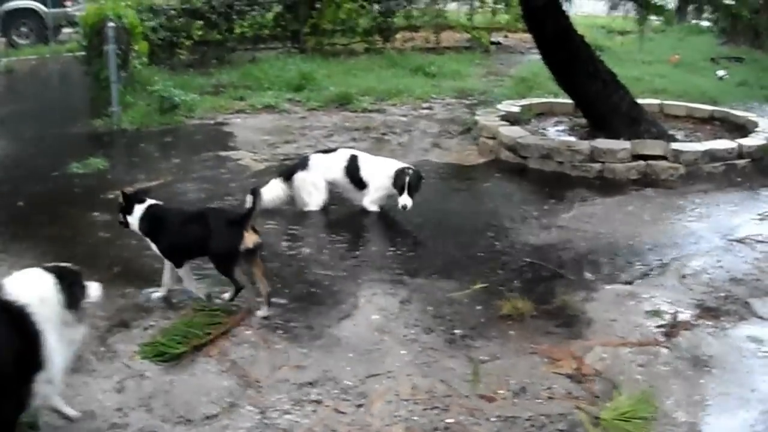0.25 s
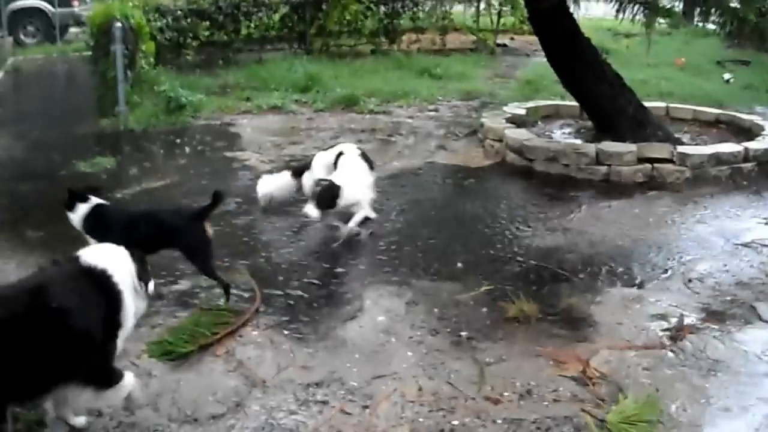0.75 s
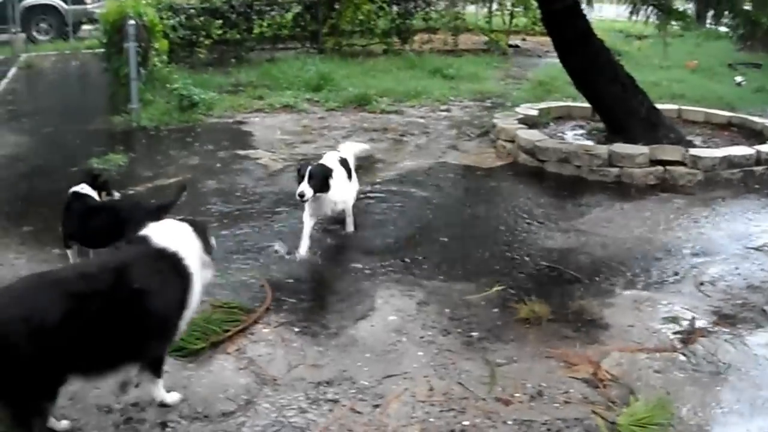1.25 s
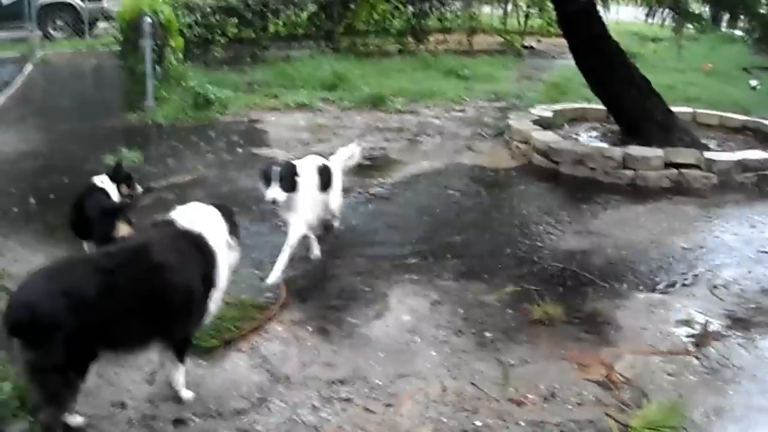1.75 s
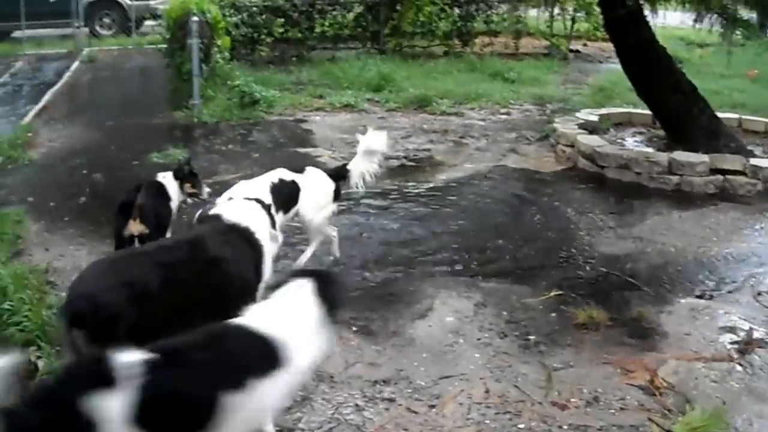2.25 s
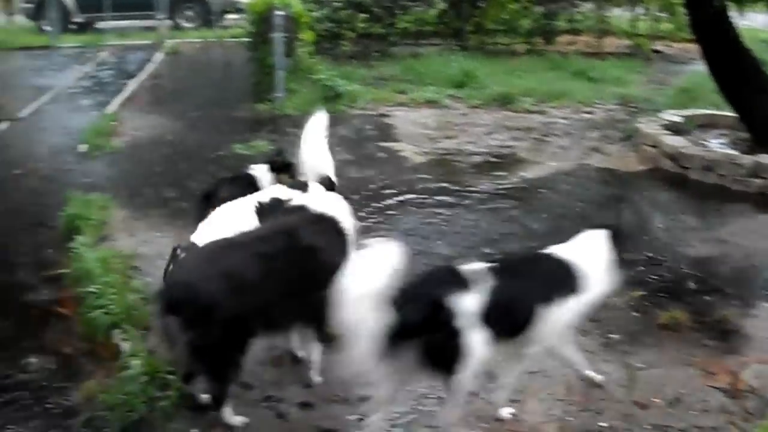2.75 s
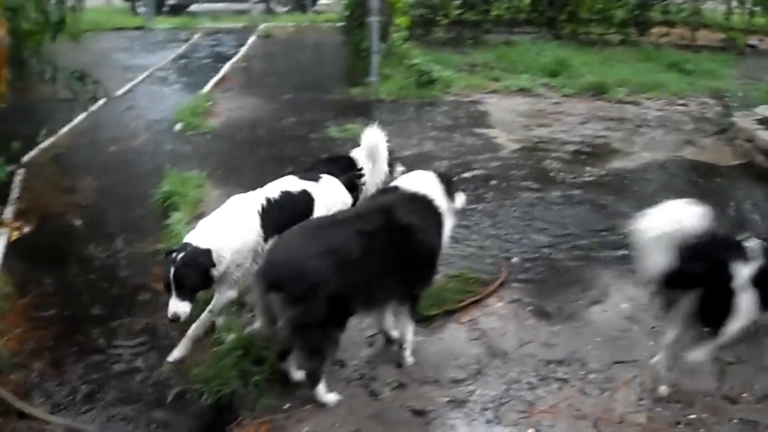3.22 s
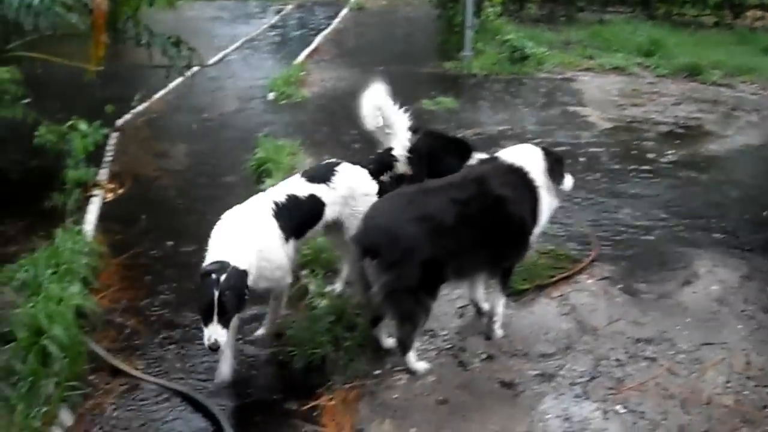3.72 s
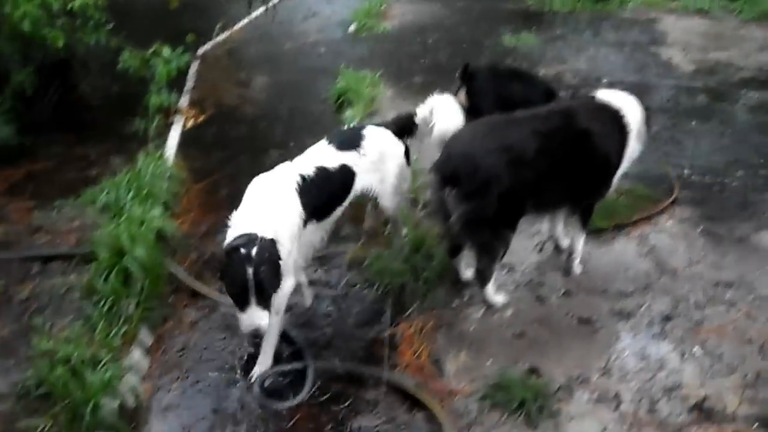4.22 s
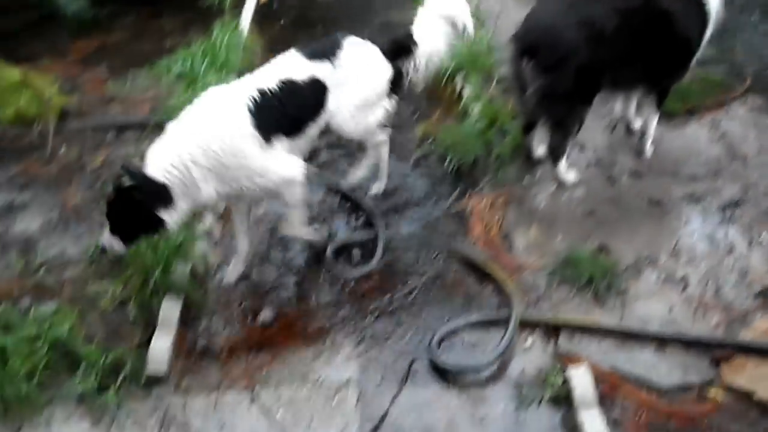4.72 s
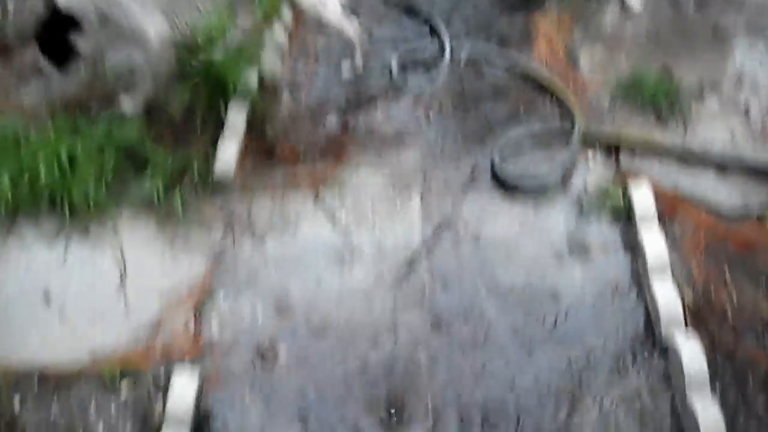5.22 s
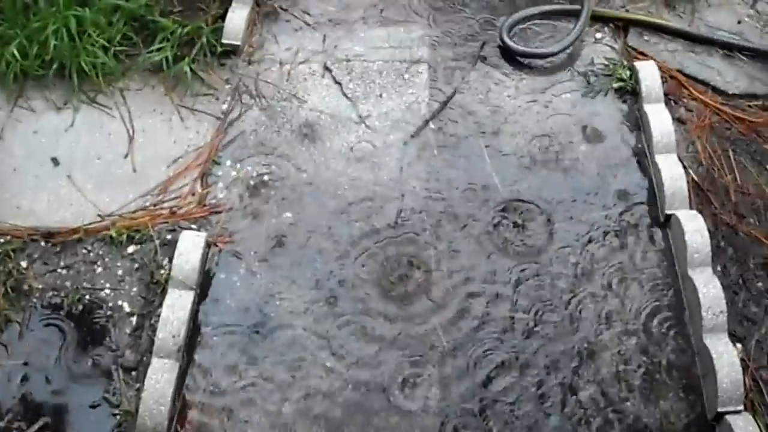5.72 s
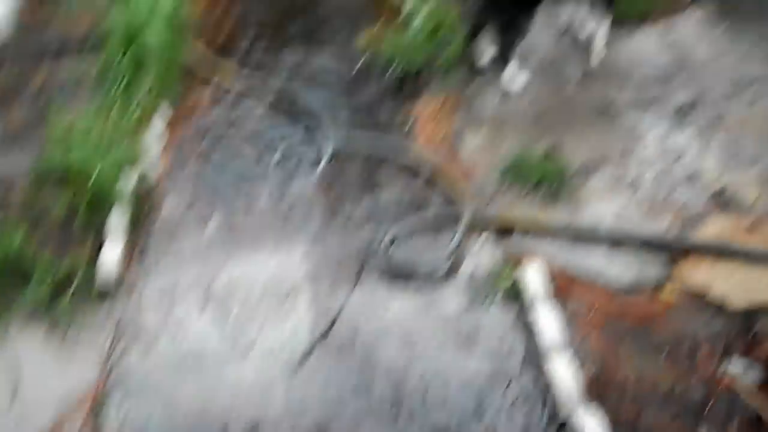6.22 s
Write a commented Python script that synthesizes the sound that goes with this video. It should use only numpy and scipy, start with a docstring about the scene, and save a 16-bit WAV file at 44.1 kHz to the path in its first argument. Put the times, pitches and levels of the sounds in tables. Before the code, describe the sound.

Steady rain falls on a flooded outdoor yard, heard through one small camera microphone. A broad soft hiss carries dense patter, fine clicks and tiny ringing bubbles. Hard dry ticks strike the casing early on. The sound cuts to complete silence twice, each time for just under half a second, then returns at once. Later, close splats and clear water plips become more frequent over a barely audible low rumble.

```python
"""A flooded yard in steady rain, heard by one small camera microphone.
Far drops merge into a wash of shaped noise; middle ones patter as random noise grains and clicks.
Bubbles ring as decaying sines, near drops splat as crackling noise bursts, and a few drops tick on
the camera casing as short damped modes. A faint drone and a swelling rumble lie underneath.
Twice the sound cuts out completely."""
import sys
import numpy as np
from scipy import signal
from scipy.fft import rfft, irfft
from scipy.io import wavfile
from scipy.ndimage import uniform_filter1d

SR = 44100
rng = np.random.default_rng(int(sys.argv[2]) if len(sys.argv) > 2 else 0)


def dump(signal):
    """Clip the signal to [-1, 1] and save it as 16-bit WAV at the path in sys.argv[1]."""
    limited = np.clip(np.atleast_2d(signal).T, -1, 1)
    pcm = np.round(limited * 32767).astype(np.int16)
    wavfile.write(sys.argv[1], SR, pcm)


N = 285327  # samples

# low drone bands: (centre [Hz], level [dB], offset at half amplitude [Hz])
DRONE_BANDS = [(57, -71, 4.1), (173.2, -73.5, 4)]
# rumble swells: (top [s], level [dB], time from top to 1/e [s])
RUMBLE_SWELLS = [(0.078, -71, .15), (1.55, -66, 0.18), (3.62, -62.5, 0.1), (5.15, -72, .2)]
RUMBLE_FLOOR_DB = -74.5
# far-rain spectrum, shape only: (frequency [Hz], relative density [dB per Hz])
WASH_SPECTRUM = [(20, -9.5), (40, -17.5), (100, 4), (160, -7), (260, -1.5), (450, -2), (750, 1.5),
                 (1400, 0.1), (2500, 0.35), (4200, -2.5), (8000, -5.5), (12000, -10.5), (15000, -12.5),
                 (16000, -17.5)]
WASH_DB = -45.5  # before the shower gain
# rain strength: (time [s], gain [dB])
SHOWER_GAIN = [(0, -0.7), (0.698, 0.53), (3.3, -0.04), (6.4, .5)]
# larger bubbles: (time [s], level before shower gain [dB], starting pitch [Hz], decay to 1/e [cycles])
LARGE_BUBBLES = [(1.442, -38.5, 2470, 31), (2.937, -37.5, 2310, 17), (4.915, -39, 3220, 14),
                 (5.093, -34.5, 3000, 13), (5.858, -35, 1730, 11), (6.102, -45, 2030, 10),
                 (6.293, -33, 3220, 13)]
# near splashes: (time [s], relative level [dB], band centre before tilt [Hz],
#   half of the centre-to-1/e width [octaves], impact t60 [s])
NEAR_SPLASHES = [ (.912, -42.5, 776, 0.35, .17), (.955, -34, 3350, .3, .03), (1.291, -40, 6800, 1.2, 0.085),
                 (1.839, -37, 4700, .7, 0.11), (2.357, -35.5, 3500, 1.2, .05),
                 (2.414, -24.5, 9300, 0.35, 0.014), (3.3421, -28, 3600, 0.47, 0.013),
                 (3.598, -38.5, 6000, 0.68, 0.19), (3.610, -38, 5000, .55, .014),
                 (3.637, -30, 6540, 0.76, 0.022), (3.675, -40.5, 4200, 1.1, .08),
                 (4.0065, -31.5, 8250, 0.21, 0.019), (4.446, -37.5, 7000, 0.8, .06),
                 (4.657, -37.5, 7860, 0.45, 0.11), (4.780, -36.5, 7400, 0.27, 0.057),
                 (5.079, -39, 2500, 0.28, 0.078), (5.095, -43, 8500, 0.51, .11),
                 (5.134, -33.5, 8000, 1, .022), (5.224, -32.5, 6650, 0.24, 0.061),
                 (5.309, -44, 3000, .35, 0.072), (5.387, -39, 8500, .35, .06),
                 (5.453, -30, 6800, 0.64, .014), (5.457, -35, 6200, 0.56, .022),
                 (5.510, -40.5, 5600, 0.48, 0.074), (5.856, -40.5, 1800, 0.41, .09),
                 (6.102, -36, 2400, 0.46, .036), (6.2925, -37, 3200, 0.39, .018)]
# drops on the camera: (time [s], level added to each mode [dB], place struck [key of CASING_MODES])
CASING_HITS = [(0.0743, -10.5, "lid"), (.8430, -17.5, "edge"), (0.9567, -25, "lid"), (1.7590, -9.5, "lid")]
# casing modes by place struck: (frequency [Hz], relative level [dB], t60 of the exponential factor [s])
CASING_MODES = {"lid": [(3460, -1, 0.0016), (4030, -4.5, 0.0015), (6720, -7.5, 0.0021), (9130, -1, 0.0014),
                (14000, -3.5, 0.00077)], "edge": [(3285, -8.5, 0.004), (4560, -3.5, 0.0035),
                (5760, -15, 0.005), (9500, 8.5, 0.00068), (14900, 1, 0.00089)]}
# dead silences: (start [s], end [s])
SILENT_SPANS = [(.2083, .6385), (1.8900, 2.3105)]
BAND_LIMIT_HZ = 15950


def gain_of(db):
    """Decibels to amplitude."""
    return 10 ** (np.asarray(db) / 20)


def evened(x):
    """Scales to rms 1."""
    return x / np.sqrt(np.mean(x ** 2) + 1e-20)


def read_spectrum(points, hz):
    """Joins spectrum points by straight lines on a log-frequency axis."""
    point_hz, value = np.transpose(points)
    return np.interp(np.log(hz + 1), np.log(point_hz + 1), value)


def add(mix, time_s, sound):
    """Mixes a sound in at time_s, cut at the end of the mix."""
    part = mix[max(round(time_s * SR), 0):][:len(sound)]
    part += sound[:len(part)]


def t60_decay(t_s, t60_s):
    """Exponential fall of 60 dB in t60_s."""
    return np.exp(-np.log(1000) * t_s / t60_s)


def drone():
    """Narrow bands of noise waver as low hums."""
    hz = np.fft.rfftfreq(N, 1 / SR)
    out = np.zeros(N)
    for centre_hz, db, width_hz in DRONE_BANDS:
        resonance = 1 / (1 + ((hz - centre_hz) / width_hz) ** 2)
        hum = irfft(rfft(rng.standard_normal(N)) * resonance, N)
        out += gain_of(db) * evened(hum)
    return out


def rumble(low_hz=20, top_hz=66):
    """Deep band noise over a steady floor, with soft Gaussian swells."""
    t_s = np.arange(N) / SR
    band = signal.butter(3, [low_hz, top_hz], "band", fs=SR)
    noise = signal.lfilter(*band, rng.standard_normal(N))
    swells = sum(gain_of(db) * np.exp(-((t_s - top_s) / half_s) ** 2)
                 for top_s, db, half_s in RUMBLE_SWELLS)
    return evened(noise) * np.hypot(gain_of(RUMBLE_FLOOR_DB), swells)


def wash(patchy_db=0.84, flicker_db=0.7):
    """Far drops merge into noise whose colour shifts in small time-frequency patches."""
    hz, _, z = signal.stft(rng.standard_normal(N), SR, nperseg=1024, noverlap=768)
    patches = uniform_filter1d(rng.standard_normal(z.shape), size=11, axis=0)
    patches = evened(uniform_filter1d(patches, size=5, axis=1))
    # level flicker common to all frequencies
    flicker = evened(uniform_filter1d(rng.standard_normal(z.shape[1]), size=8))
    colour_db = read_spectrum(WASH_SPECTRUM, hz)[:, None]
    z = z * gain_of(colour_db + patchy_db * patches + flicker_db * flicker)
    noise = signal.istft(z, nperseg=1024, noverlap=768)[1][:N]
    return gain_of(WASH_DB) * evened(noise)


def fine_ticks(per_s=90, level_db=-60, spread_db=5.5, low_hz=2500):
    """Drops on bare wet stone: dry, sharp clicks with no spray, a few large and most small."""
    chance, rank = rng.random((2, N))
    clicks = (chance < per_s / SR) * gain_of(-spread_db * np.log(rank + 0.04))
    low_cut = signal.butter(2, low_hz, "high", fs=SR)
    return gain_of(level_db) * evened(signal.lfilter(*low_cut, clicks))


def bubble(hz, cycles, rise=0.035):
    """A pocket of trapped air rings and rises slightly in pitch as it nears the surface."""
    t_s = np.arange(SR // 20) / SR
    age = t_s * hz / cycles
    phase = 2 * np.pi * hz * t_s * (1 + rise * np.tanh(age / 2))
    return np.sin(phase) * np.exp(-age)


def bubbles(level_db=-51, spread_db=3, low_hz=1300, high_hz=4000, count=700):
    """Many tiny, short bubbles ring in the puddles, with a few larger plips."""
    out = np.zeros(N)
    for when, pitch, rank, damping in rng.random((count, 4)):
        ring = bubble(low_hz * (high_hz / low_hz) ** pitch, cycles=3 + 10 * damping)
        add(out, when * N / SR, gain_of(level_db - spread_db * np.log(rank + 0.15)) * ring)
    for time_s, db, hz, cycles in LARGE_BUBBLES:
        add(out, time_s, gain_of(db) * bubble(hz, cycles))
    return out


def splash(size, centre_hz, octaves, t60_s, crackle_db=2.5, spray_db=-16, spray_t60_s=0.2):
    """A crackle of tiny droplets: the impact dies fast, then the thrown spray patters down."""
    hz, t_s = np.fft.rfftfreq(size, 1 / SR), np.arange(size) / SR
    hiss, clumps = rng.standard_normal((2, size))
    clumps = np.clip(evened(uniform_filter1d(clumps, size=6)), -2, 2)
    droplets = hiss * gain_of(crackle_db * clumps)
    offset_octaves = np.log2((hz + 1) / centre_hz)
    band = np.exp(-abs(offset_octaves / (2 * octaves)) ** 2.6)
    band = band / np.sqrt(hz + 1) * (hz < BAND_LIMIT_HZ)  # tilt of -3 dB per octave
    fade = np.hypot(t60_decay(t_s, t60_s), gain_of(spray_db) * t60_decay(t_s, spray_t60_s))
    burst = irfft(rfft(droplets) * band) * fade
    return evened(burst) * np.sqrt(np.mean(fade ** 2))


def patter(per_s, level_db, low_hz, high_hz, octaves, t60_s, spread_db, count=40):
    """Middle-distance drops: many kinds of splash, each at random times with random size."""
    out = np.zeros(N)
    for centre_hz in np.geomspace(low_hz, high_hz, count):
        chance, rank = rng.random((2, N))
        grain = splash(size=4096, centre_hz=centre_hz, octaves=octaves, t60_s=t60_s)
        for i in np.flatnonzero(chance < per_s / count / SR):
            drop_gain = gain_of(-spread_db * np.log(rank[i] + 0.055))  # few large, most small
            add(out, i / SR, grain * drop_gain)
    return gain_of(level_db) * evened(out)


def near_splashes(level_db=-1):
    """Single large drops splat on water and wet stone close by."""
    out = np.zeros(N)
    for time_s, db, centre_hz, octaves, t60_s in NEAR_SPLASHES:
        splat = splash(size=8192, centre_hz=centre_hz, octaves=octaves, t60_s=t60_s)
        add(out, time_s, gain_of(level_db + db) * splat)
    return out


def camera_ticks(low_cut_hz=2200):
    """A drop on the casing: its damped modes swell and die within a few milliseconds."""
    out, t_s = np.zeros(N), np.arange(SR // 20) / SR
    low_cut = signal.butter(2, low_cut_hz, "high", fs=SR)
    for time_s, db, place in CASING_HITS:
        for k, (hz, mode_db, t60_s) in enumerate(CASING_MODES[place]):
            age = np.log(1000) * t_s / t60_s
            swell = age * np.exp(1 - age)
            ring = (-1) ** k * swell * np.sin(2 * np.pi * hz * t_s)  # neighbours swing opposite ways
            add(out, time_s, gain_of(db + mode_db) * signal.lfilter(*low_cut, ring))
    return out


def scene():
    """The shower gain drives the rain layers; close drops, drone and rumble keep their own levels."""
    plops = patter(per_s=220, level_db=-54.5, low_hz=790, high_hz=4200,
                   octaves=0.25, t60_s=0.013, spread_db=3.3)
    spatter = patter(per_s=190, level_db=-57, low_hz=4550, high_hz=14500,
                     octaves=0.21, t60_s=0.02, spread_db=4.0)
    splats = patter(per_s=16, level_db=-58.0, low_hz=2600, high_hz=13100,
                    octaves=0.32, t60_s=0.06, spread_db=2.2)
    shower = gain_of(np.interp(np.arange(N) / SR, *np.transpose(SHOWER_GAIN)))
    rain = (wash() + fine_ticks() + bubbles() + plops + spatter + splats) * shower
    mono = drone() + rumble() + rain + near_splashes() + camera_ticks()
    return np.array([mono, mono])


def record(dry):
    """Cuts the sound out twice, then limits the band with a linear-phase low-pass."""
    t_s = np.arange(N) / SR
    live = np.all([(t_s < start_s) | (t_s > end_s) for start_s, end_s in SILENT_SPANS], axis=0)
    low_pass = signal.firwin(301, BAND_LIMIT_HZ, window=("kaiser", 8), fs=SR)
    return signal.oaconvolve(dry * live, low_pass[None], "same", axes=1)


dry = scene()
out = record(dry)
dump(out)
```